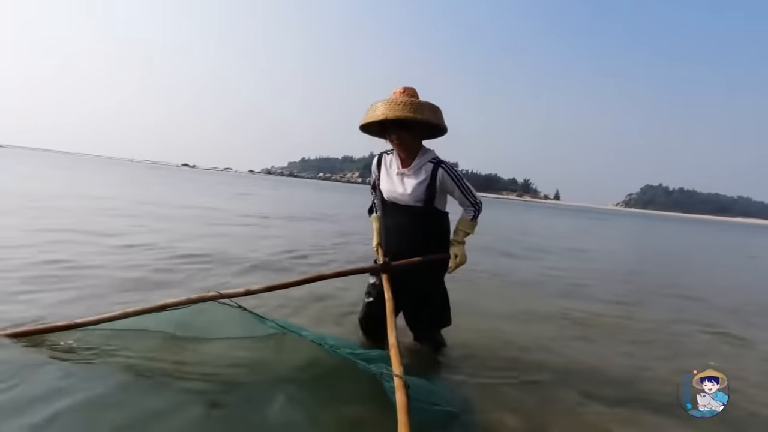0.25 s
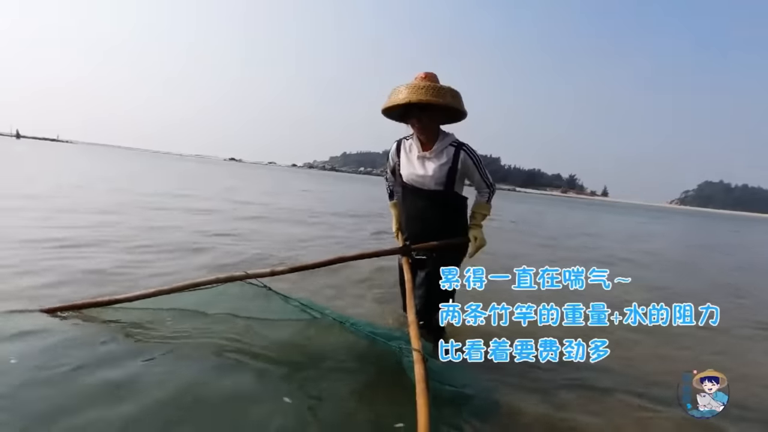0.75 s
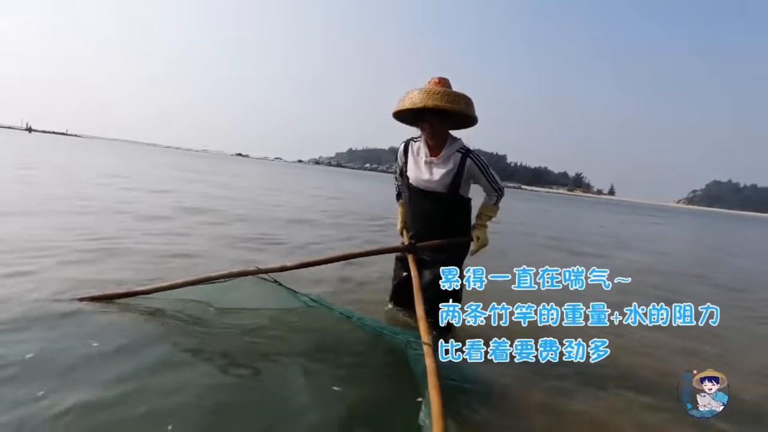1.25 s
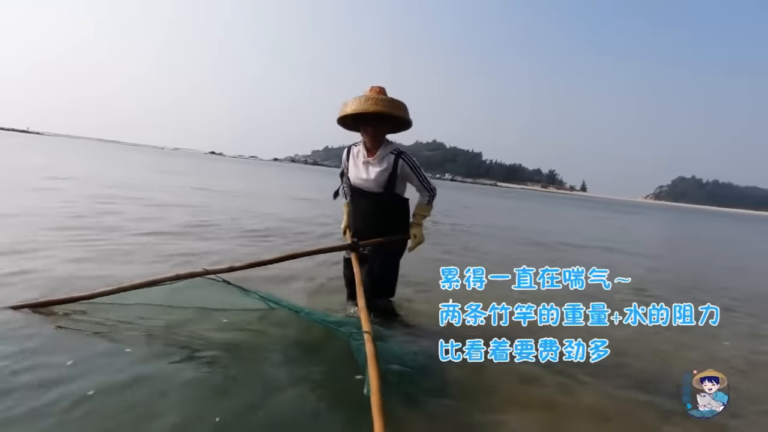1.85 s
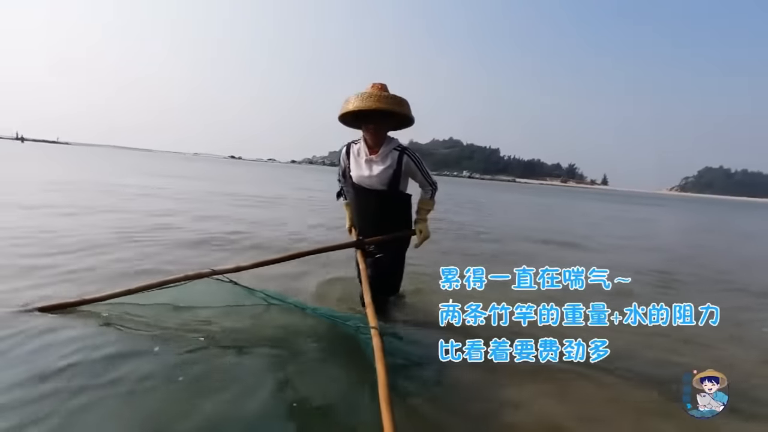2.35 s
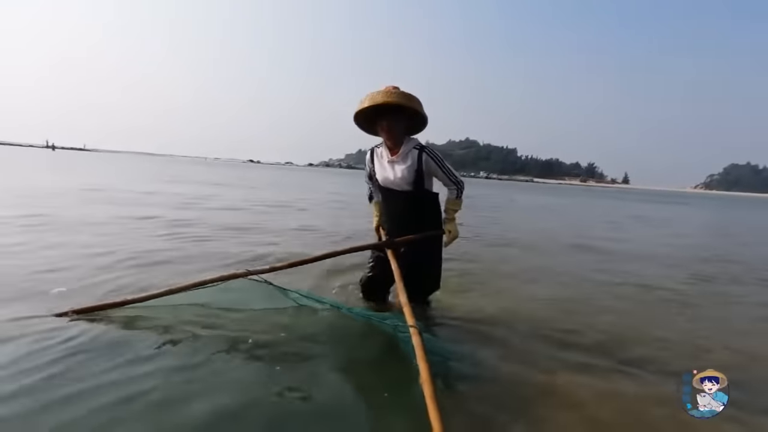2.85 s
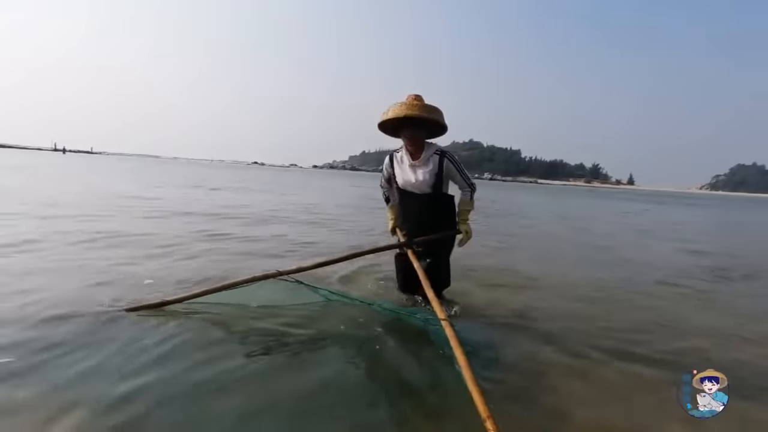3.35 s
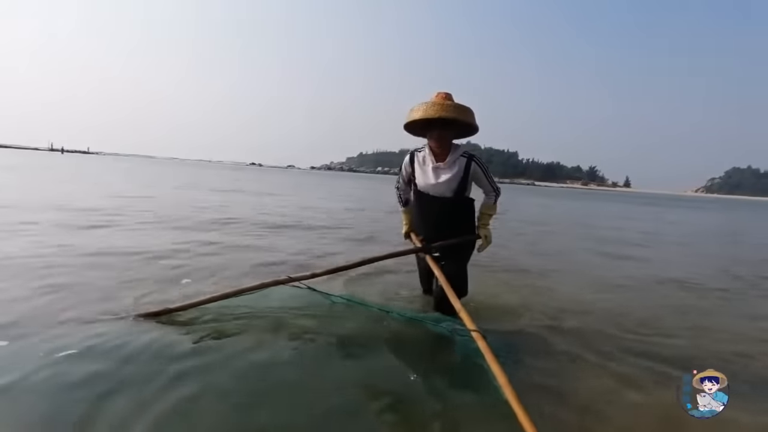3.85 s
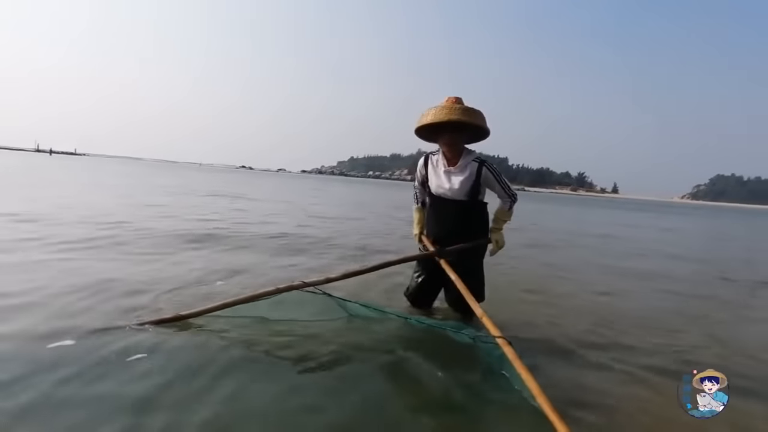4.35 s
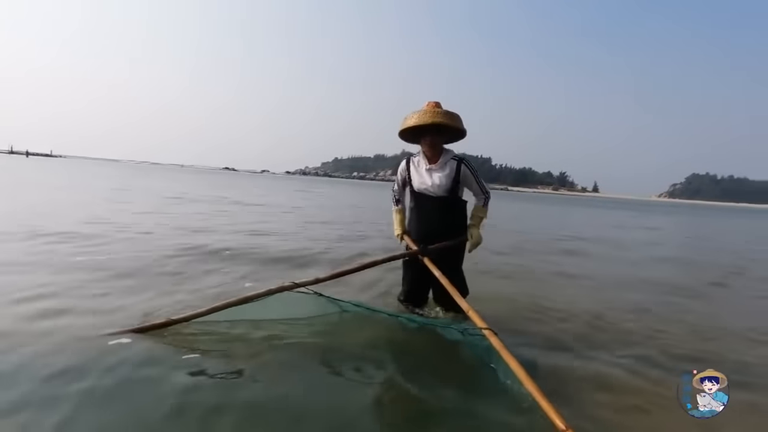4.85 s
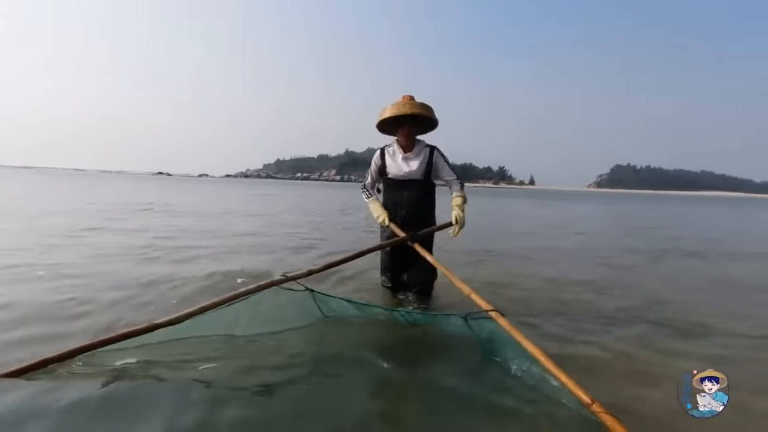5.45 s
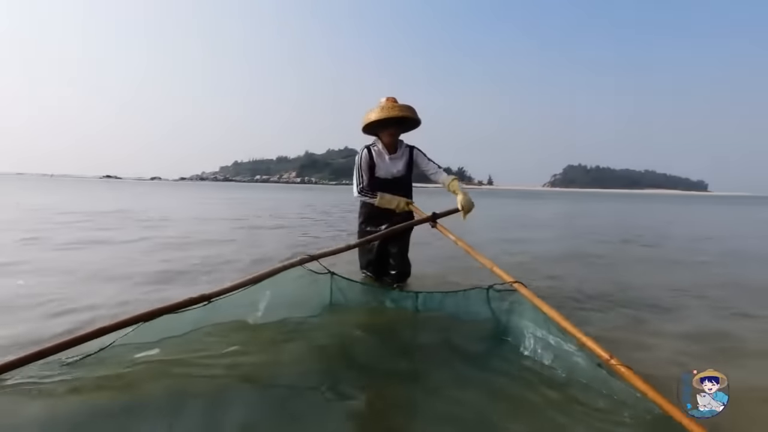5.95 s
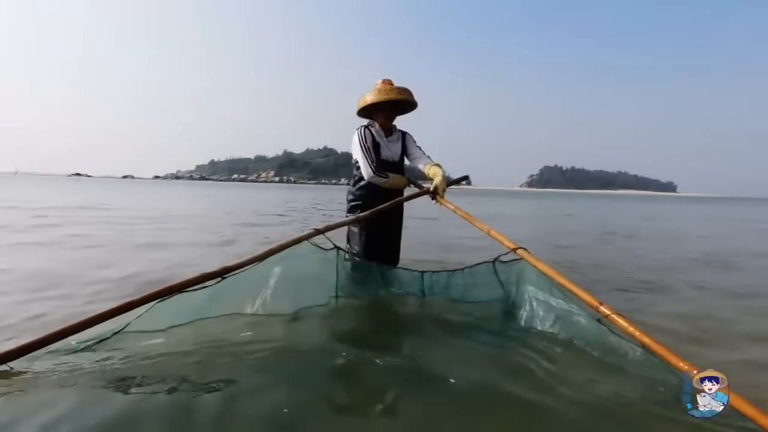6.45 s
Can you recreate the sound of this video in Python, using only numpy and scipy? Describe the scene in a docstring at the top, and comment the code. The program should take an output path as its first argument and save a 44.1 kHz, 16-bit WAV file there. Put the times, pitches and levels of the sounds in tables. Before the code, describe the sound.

Someone wades through shallow sea pushing a net on poles, with bubbly splashes, hissing swishes and popping drops, close up, fading to near silence.

```python
"""A swish of spray and small bubbles at each stride of someone wading through shallow sea water, pushing
a net on two poles, heard close by two microphone ports. The swish is clumped ringing bubbles and hiss, cut
off sharply below a moving lower edge; single drops pop in it as short decaying tones.
Mostly below the edge come short low bloops, thin wavering tones and narrow noisy patches, over a faint low
murk of band-limited noise. A dull slap and a very faint noise floor complete it."""
import sys
import numpy as np
from scipy import signal
from scipy.io import wavfile
from scipy.ndimage import uniform_filter1d

SR = 44100
rng = np.random.default_rng(int(sys.argv[2]) if len(sys.argv) > 2 else 0)


def invert_db(x):
    """Field ratio 10**(x/20) for x, a level in decibels (scalar or array-like)."""
    u = np.asarray(x, float) / 20
    return 10 ** u


def waveform_to_disk(signal):
    """Save audio, clipped to [-1, 1], as 16-bit WAV at the path in sys.argv[1]."""
    frames = np.transpose(np.atleast_2d(signal))
    scaled = np.clip(frames, -1, 1) * 32767
    samples = np.round(scaled).astype(np.int16)
    wavfile.write(sys.argv[1], SR, samples)


N = 295470


# Lower edge of the swish. Each row: time in seconds, edge in Hz.
LOWER_EDGE = [(1.06, 1380), (1.08, 804), (1.16, 1106), (1.3, 1090), (1.58, 1191), (1.75, 1387),
              (2.42, 1513), (2.46, 2037), (4.75, 2020), (4.8, 1854), (5.3, 1845), (5.4, 1697), (5.66, 1670),
              (5.72, 1413)]
# Share of the water noise common to both ports. Each row: pitch in Hz, likeness 0-1.
PORT_LIKENESS = [(300, 1), (1200, 0.88), (2200, 0.88), (4000, 0.067), (8000, 0.18)]
# Phase lead of the left port for water fully aside. Each row: pitch in Hz, lead in radians.
LEFT_PHASE_LEAD = [(0, 0), (1380, -0.3), (2410, -1.3), (5170, -5.6), (6030, -6.4), (7670, -4.9),
                   (8180, -6.3), (10600, -6.7)]
# How far aside the water sounds. Each row: time in seconds, share 0-1 of the phase lead.
WATER_ASIDE = [(2.3, .15), (2.6, 1.0), (6.0, 1.0), (6.3, .1)]


def water():
    """Swish and drops: shared noise turned in phase between the ports, plus own noise per port."""
    streams = [bubbles(per_s=1500, spread_db=4.0, cycles=18.0, clump_db=6.5, hiss_db=1.0) for _ in range(3)]
    hz, t, (shared, *own) = frames(streams)
    alike = np.clip(at_hz(PORT_LIKENESS, hz), 0, 1)[:, None]
    aside = in_time(WATER_ASIDE, t)[0]
    turn = np.exp(0.5j * np.outer(at_hz(LEFT_PHASE_LEAD, hz), aside))
    turns = np.array([turn, turn.conj()])
    spray = np.sqrt(alike) * shared * turns + np.sqrt(1 - alike) * np.array(own)
    swish = swish_colour(hz, t) * spray
    popping = frames(drops())[2] * turns
    upper_edge_hz = 10900
    inside = (hz[:, None] > in_time(LOWER_EDGE, t)[0]) & (hz[:, None] < upper_edge_hz)
    return from_frames((swish + popping) * inside)


# Drive of the swish. Each row: time in seconds, vigour in dB, brightness in dB.
WADING_DRIVE = [(0.0, -88, -28), (0.26, -98.5, -33), (0.59, -52.5, -20), (0.82, -54.5, -16),
                (0.93, -36.5, -12.5), (1.3, -40.5, -2.5), (1.44, -45, -7.5), (1.62, -46, -16),
                (1.88, -58, -6.5), (2.1, -48.5, -19), (2.55, -55, -6), (2.68, -37, -8.5),
                (2.82, -41.5, -12.5), (3.0, -41.5, -6.5), (3.33, -44, -10), (3.5, -36.5, -8),
                (3.58, -36.5, 0), (3.8, -40, -4), (4.44, -41, -11.5), (4.6, -50.5, -13), (4.85, -43.5, -6),
                (4.99, -34, -2.5), (5.32, -44.5, -6), (5.62, -55, 1), (6.05, -60, -4.5), (6.4, -64, -10.5),
                (6.7, -73.5, -17)]
# Borders of the swish bands, in Hz.
BAND_EDGES_HZ = [1400, 2000, 3300, 5300, 7000, 8300, 9600, 10800]
# Each row, one band: offset in dB at mean vigour, share of the vigour's swing, share of the brightness.
BAND_RESPONSE = [(1, 1.47, 0.66), (-2, 1.43, 0.023), (-2, 1.225, 0.81), (-6, 1.11, 1.3), (5, 1.4, 0.33),
                 (-22.5, 2.4, 2.4), (-34.5, 1.1, 1.1)]
# Short splashes. Each row: peak time in seconds, level in dB, centre in Hz, length in seconds.
SPLASH_BURSTS = [(0.2, -81, 1960, 0.19), (0.39, -63.5, 1890, 0.049), (0.52, -59, 3830, 0.042),
                 (0.57, -60, 3937, 0.042), (0.59, -44, 1780, 0.067), (0.65, -34, 3820, 0.0089),
                 (0.93, -30, 1830, 0.014), (1.1, -29.5, 1150, 0.061), (1.17, -53, 7930, 0.17),
                 (1.34, -29.5, 1553, 0.16), (1.55, -45, 1496, .06), (1.68, -40, 4400, 0.03),
                 (1.96, -47, 3850, 0.13), (2.03, -41.5, 1950, 0.076), (2.23, -48, 3430, 0.044),
                 (2.31, -49.5, 1710, 0.066), (2.7, -73, 9050, 0.034), (3.6, -46, 9420, 0.092),
                 (5.0, -34, 1950, 0.031), (5.05, -48.5, 9400, 0.15), (5.4, -42, 1822, 0.14),
                 (5.55, -49, 1850, 0.21), (6.08, -49, 1470, 0.082), (6.1, -62, 2310, 0.19),
                 (6.55, -60, 3380, 0.071)]


def swish_colour(hz, t):
    """Gain: vigour and brightness raise each band by its shares; splashes add power; lumps break it up."""
    mean_vigour_db = -45
    vigour_db, bright_db = in_time(WADING_DRIVE, t)
    band_db = [mean_vigour_db + db + swing * (vigour_db - mean_vigour_db) + share * bright_db
               for db, swing, share in BAND_RESPONSE]
    steady = banded(band_db, BAND_EDGES_HZ, hz, blur=0.095)
    splashes = swells(SPLASH_BURSTS, hz, t, octaves=0.32, rise=0.79)
    coarse_db = 2.16 * patches(hz, t, wide=12, long=6)
    fine_db = 3.0 * patches(hz, t, wide=3, long=5)
    return np.hypot(steady, splashes) * rms_one(invert_db(coarse_db + fine_db))


def bubbles(per_s, spread_db, cycles, clump_db, hiss_db):
    """Bubbles burst at random in clumps and ring briefly over hiss that swells faintly with them; rms 1."""
    sizes = invert_db(spread_db * np.minimum(rng.exponential(1, N), 5)) * rng.choice([-1, 1], N)
    clumps = invert_db(clump_db * drift(18.0) + 1.2 * drift(80.0))
    born = rng.random(N) < per_s * clumps / SR
    pitches_hz = np.geomspace(850, 11000, 30)
    dealt = rng.integers(0, 30, N)
    rings = sum(hz * ring(sizes * born * (dealt == k), hz, cycles) for k, hz in enumerate(pitches_hz))
    hiss = rms_one(clumps ** 0.049 * rng.standard_normal(N))
    return rms_one(rms_one(rings) + invert_db(hiss_db) * hiss)


# Single drops. Each row: start in seconds, pop level in dB, starting pitch in Hz.
DROP_POPS = [(0.4146, -42.5, 2025), (0.5245, -20, 4000), (0.527, -28, 1830), (0.5798, -28.5, 2030),
             (0.6451, -23.5, 2820), (0.752, -38.5, 2320), (0.881, -20, 3000), (0.9055, -27, 1444),
             (0.941, -17, 2250), (0.959, -21, 1960), (1, -23.5, 2500), (1.038, -20.5, 1440),
             (1.2345, -24, 2290), (1.311, -17, 1276), (1.328, -22, 1600), (1.344, -22, 1500),
             (1.367, -22, 1440), (1.378, -24, 1954), (1.3933, -15, 1623), (1.411, -26, 1480),
             (1.543, -24, 1454), (1.564, -29, 1523), (1.6571, -22, 5030), (1.6767, -14.5, 3980),
             (1.9019, -22.5, 1897), (1.926, -22.5, 3430), (2.036, -24, 1830), (2.106, -15, 2920),
             (2.292, -34, 1810), (2.5825, -21.5, 3690), (2.6516, -21, 3000), (2.668, -22, 5900),
             (2.682, -11, 3030), (2.7087, -20, 5000), (2.9676, -12, 3400), (3.0392, -15.5, 2730),
             (3.259, -28.5, 2310), (3.3857, -21.5, 2670), (3.5603, -15, 5380), (3.572, -14.5, 6300),
             (3.606, -20, 5000), (3.674, -23, 5600), (3.738, -23.5, 7640), (3.875, -19.5, 4170),
             (3.9197, -17.5, 2780), (4.0773, -25.5, 2070), (4.1331, -14.5, 2970), (4.211, -19.5, 5200),
             (4.266, -23, 2480), (4.5297, -29, 2430), (4.8045, -25.5, 2030), (4.9208, -21.5, 5850),
             (4.9996, -16.5, 2090), (5.021, -24.5, 6200), (5.0768, -15.5, 5070), (5.093, -18, 6730),
             (5.174, -23.5, 2090), (5.232, -21.5, 7430), (5.3111, -29.5, 2030), (5.5386, -21.5, 1598),
             (5.703, -32.5, 2420), (5.8723, -32, 6940), (6.0182, -34.5, 2250)]


def drops():
    """Each drop pops for a few rising cycles, fewer above 3500 Hz, with a spatter of noise near its pitch."""
    length = 1800
    out, t = np.zeros(N + length), np.arange(length) / SR
    for s, db, hz in DROP_POPS:
        u = rng.random()
        cycles = hz * t
        short = min(1, 3500 / hz) ** 1.8
        rise = (1 - np.exp(-cycles / (3.1 * short))) ** 3
        shape = rise * np.exp(-cycles / ((2.1 + 0.8 * u) * short))
        pop = shape / shape.max() * np.sin(2 * np.pi * (cycles * (1 + 0.003 * cycles) + u))
        noise = rng.standard_normal(length)
        tuned = rms_one(ring(ring(noise, hz, cycles=10.0), hz, cycles=10.0))
        spatter = tuned * np.exp(-t / 0.0059) * (1 - np.exp(-t / 0.0016)) ** 2
        i = round(s * SR)
        out[i:i + length] += invert_db(db) * (pop + invert_db(-11.0) * spatter)
    return out[:N]


# Short unsteady tones: low bloops, thin wavering tones, narrow noisy patches.
# Each row: centre in seconds, level in dB, pitch in Hz, length in seconds (played as at least 0.022).
UNSTEADY_TONES = [(1.105, -53.5, 328, 0.018), (1.162, -56, 323, 0.043), (1.298, -25, 378, 0.033),
                  (1.325, -35, 685, 0.032), (1.334, -15, 385, 0.023), (1.397, -31, 671, 0.036),
                  (2.394, -58.5, 1702, 0.087), (2.581, -65, 1713, 0.053), (2.765, -73, 1716, 0.035),
                  (2.846, -32.5, 292.5, 0.027), (2.892, -33, 305.7, 0.036), (2.932, -45, 1726, 0.081),
                  (3.01, -42.5, 1690, 0.031), (3.092, -47, 1757, 0.086), (3.117, -38, 1703, 0.042),
                  (3.198, -44.5, 1722, 0.052), (3.251, -34.5, 1725, 0.024), (3.294, -54, 1730, 0.031),
                  (3.549, -39.5, 324.5, 0.017), (3.629, -49.5, 268.6, 0.18), (3.72, -37.5, 237, 0.047),
                  (3.868, -27.5, 299, 0.023), (3.903, -35, 266.4, 0.019), (3.874, -53.5, 1708, 0.06),
                  (3.919, -50, 1715, 0.062), (3.939, -50.5, 264, 0.094), (4.097, -41.5, 639, 0.025),
                  (4.1, -39.5, 333, 0.036), (4.15, -69, 1350, 0.067), (4.299, -62.5, 1360, 0.034),
                  (4.446, -36.5, 1353, 0.04), (4.492, -47, 9500, 0.029), (4.64, -55.5, 1714, 0.031),
                  (4.652, -75, 1316, 0.11), (4.714, -40, 317, 0.025), (4.819, -59, 1737, 0.1),
                  (4.965, -55, 336, 0.029), (5.022, -64, 1735, 0.04), (5.161, -45.5, 317, 0.05),
                  (5.199, -58, 651, 0.048), (5.292, -57, 1745, 0.06), (5.327, -43, 320, 0.033),
                  (5.486, -49, 673, 0.058), (5.566, -53, 533, 0.031), (5.6, -56, 1397, 0.077),
                  (5.622, -44.5, 5990, 0.14), (5.666, -55, 656, 0.036), (5.792, -56, 1390, 0.058),
                  (5.82, -37.5, 351, 0.024), (5.885, -44, 7520, 0.065), (5.948, -44, 2070, 0.058),
                  (6.038, -48.5, 1395, 0.013), (6.098, -51, 1427, 0.032), (6.067, -50.5, 2227, 0.1),
                  (6.175, -53.5, 363, 0.018), (6.208, -47, 860, 0.017), (6.21, -47, 2305, 0.036),
                  (6.22, -48, 685, 0.013), (6.27, -47, 2356, 0.026), (6.28, -54, 4700, 0.052),
                  (6.303, -47.5, 2500, 0.049), (6.559, -56, 2150, 0.021)]


def unsteady_tones():
    """Each tone swells and fades more slowly, its phasor roughened; below 1780 Hz a faint lead-in and tail."""
    out, t = np.zeros((2, N)), np.arange(N) / SR
    waver, flutter, rustle, hiss = (drift(rate_hz) + 1j * drift(rate_hz)
                                    for rate_hz in (15.0, 35.0, 120.0, 450.0))
    sway = drift(10.0)
    for s, db, hz, length in UNSTEADY_TONES:
        near = slice(max(round((s - 0.3) * SR), 0), round((s + 0.3) * SR))
        dt = t[near] - s
        # higher pitches break up into faster noise
        if hz < 1780:
            rough = hz / 3500 * flutter
        elif hz < 5000:
            rough = 1.2 * rustle
        else:
            rough = 3 * hiss
        lean = 1 + 0.15 * np.tanh(dt / length)
        swell = np.exp(-(dt / (0.68 * lean * max(length, 0.022))) ** 2)
        core = swell * rms_one(1 + rough[near])
        skirt = invert_db(-23.5) * np.exp(-(dt / 0.057) ** 2) * waver[near] * (hz < 1780)
        # phase difference between the ports grows with pitch
        apart = np.exp(0.05j * hz / 400 * sway[near] * [[1], [-1]])
        out[:, near] += invert_db(db) * np.imag((core + skirt) * np.exp(2j * np.pi * hz * dt) * apart)
    return out


def slap():
    """A dull slap of water: one short push, an exponential rise and fall of 0.1 ms each."""
    dt = np.arange(N) / SR - 1.08
    return invert_db(-38) * np.exp(-np.abs(dt) / 0.0001)


# Swells of low murk. Each row: peak time in seconds, level in dB, centre in Hz, length in seconds.
MURK_SWELLS = [(1.55, -79, 387.6, 0.13), (3.3, -75, 297, 0.2), (3.64, -72, 665, 0.066),
               (3.75, -53.5, 272, 0.15), (4.2, -68, 652, 0.2), (4.45, -73.5, 326, 0.43),
               (4.8, -70, 460, 0.17), (4.8, -65.5, 672, 0.21), (5.05, -69.5, 289, 0.36),
               (5.6, -74.5, 704, 0.96), (6.1, -76, 521, 0.57), ]


def murk():
    """Faint low murk: uneven band-limited noise, nearly alike in both ports."""
    hz, t, (mid, side) = frames(rng.standard_normal((2, N)))
    lumps = rms_one(invert_db(5.5 * patches(hz, t, wide=2, long=10)))
    gain = swells(MURK_SWELLS, hz, t, octaves=0.19, rise=0.83) * lumps
    gain *= (hz[:, None] > 190) & (hz[:, None] < 730)
    return from_frames(gain * (mid + invert_db(-13) * side * [[[1]], [[-1]]]))


def noise_floor():
    """Faint white noise, independent in each port."""
    return invert_db(-108) * rng.standard_normal((2, N))


def swells(rows, hz, t, octaves, rise):
    """Gain of bursts round a centre pitch: each falls 10 dB per length, and rises in rise times that."""
    power = 0
    for s, db, centre_hz, length in rows:
        away = np.where(t < s, (s - t) / rise, t - s) / length
        bell = np.exp(-(np.log2((hz + 1) / centre_hz) / octaves) ** 2) / (2 * octaves * centre_hz / SR)
        power = power + np.outer(bell, invert_db(2 * (db - 10 * away)))
    return np.sqrt(power)


def banded(band_db, edges, hz, blur):
    """Gain over pitch and time from levels of adjoining bands; blur softens borders on a log-pitch axis."""
    per_hz_db = np.array(band_db) - 10 * np.log10(np.diff(edges) / (SR / 2))[:, None]
    past_border = 1 / (1 + (np.array(edges[1:-1]) / (hz[:, None] + 1)) ** (1 / blur))
    return invert_db(per_hz_db[0] + past_border @ np.diff(per_hz_db, axis=0))


def patches(hz, t, wide, long):
    """Chance field over pitch and time, smoothed over wide bins and long frames; spread 1."""
    field = rng.standard_normal((len(hz), len(t)))
    for _ in range(2):
        field = uniform_filter1d(uniform_filter1d(field, wide, axis=0), long, axis=1)
    return rms_one(field)


def ring(clicks, hz, cycles):
    """A unit click sets a sine of about height 1 ringing, down 60 dB after the given cycles."""
    r, w = invert_db(-60 * hz / (cycles * SR)), 2 * np.pi * hz / SR
    return signal.lfilter([0, np.sin(w)], [1, -2 * r * np.cos(w), r * r], clicks + 1e-18)


def drift(rate_hz):
    """Slow chance: noise through a steep low-pass, run in; spread 1."""
    steep = signal.butter(6, rate_hz, fs=SR, output="sos")
    return rms_one(signal.sosfilt(steep, rng.standard_normal(N + 20000))[20000:])


def rms_one(x):
    """Scale to rms 1."""
    return x / np.sqrt(np.mean(np.abs(x) ** 2) + 1e-20)


def in_time(rows, t):
    """Columns of a table read at times t."""
    s, *columns = np.transpose(rows)
    return [np.interp(t, s, c) for c in columns]


def at_hz(points, hz):
    """A table read on a log-frequency axis."""
    f, v = np.transpose(points)
    return np.interp(np.log(hz + 1), np.log(f + 1), v, left=v[0])


def frames(x):
    """Short-time spectra: pitches, times, values."""
    return signal.stft(x, SR, nperseg=1024, noverlap=768)


def from_frames(spectra):
    """Sound of short-time spectra."""
    return signal.istft(spectra, SR, nperseg=1024, noverlap=768)[1][:, :N]


def scene():
    """Swish with drops, unsteady tones, slap, murk and a faint floor."""
    return water() + unsteady_tones() + slap() + murk() + noise_floor()


def top_cut(x):
    """Nothing passes above the cut-off."""
    return signal.sosfilt(signal.butter(12, 11040, fs=SR, output="sos"), x)


def record(dry):
    """The finished mix as recorded."""
    return top_cut(dry)


dry = scene()
out = record(dry)
waveform_to_disk(out)
```